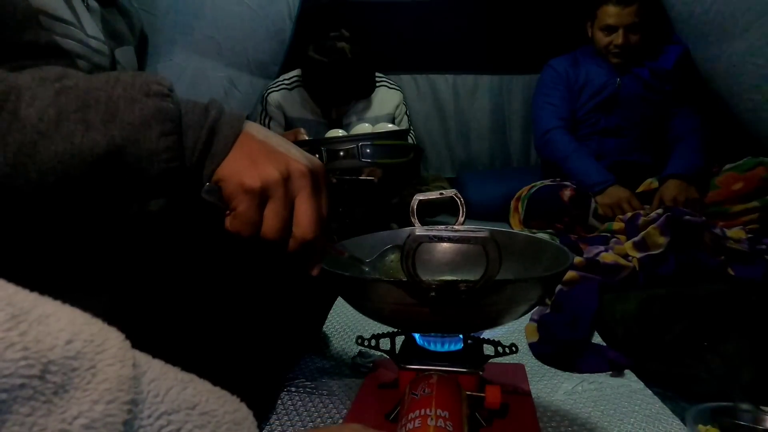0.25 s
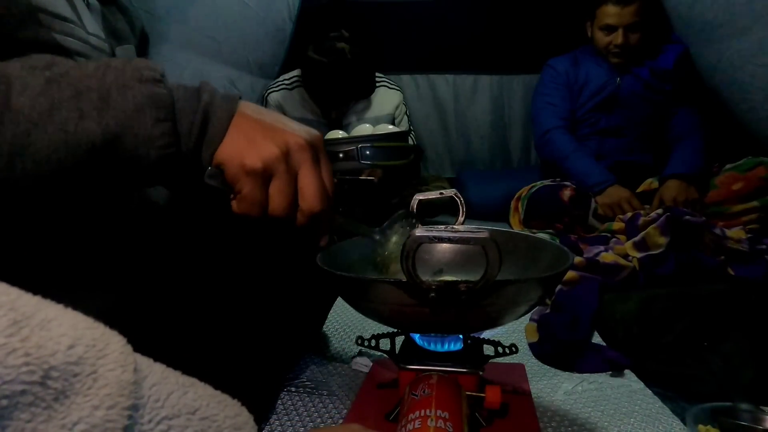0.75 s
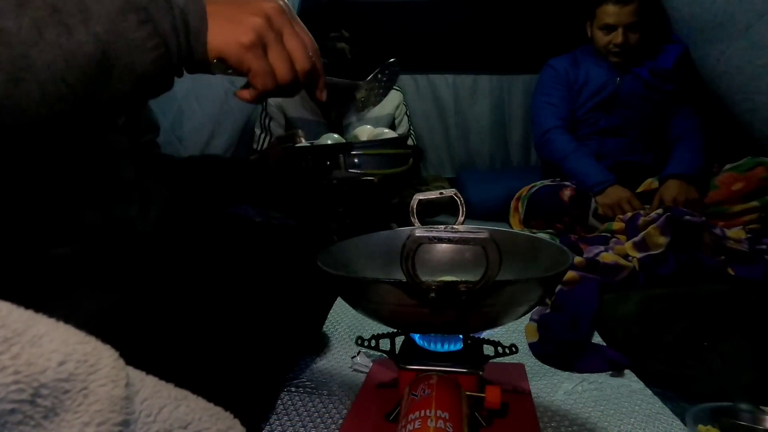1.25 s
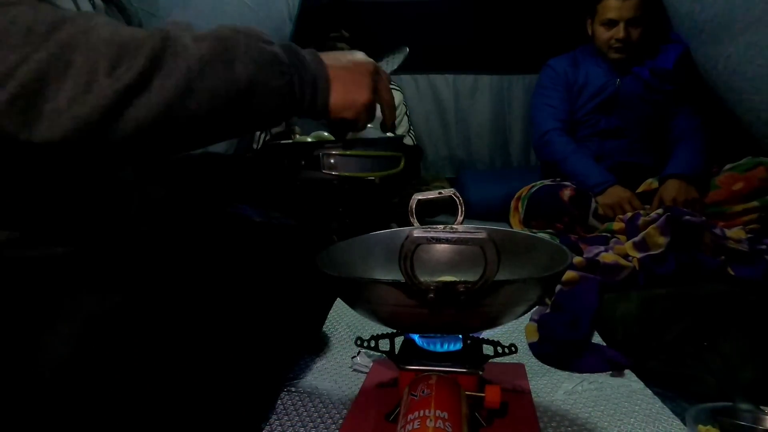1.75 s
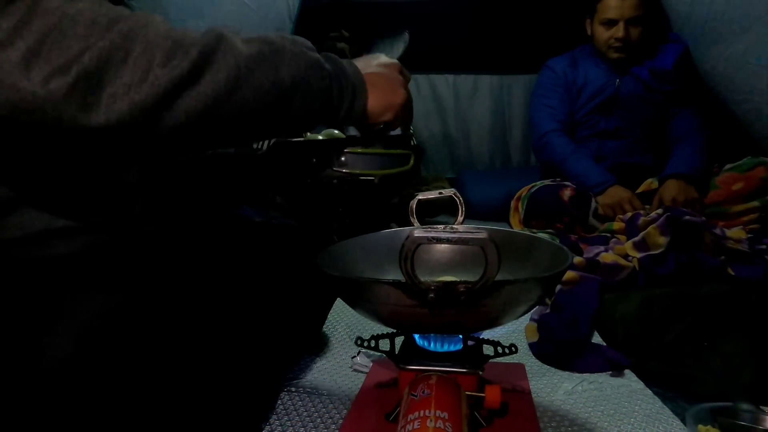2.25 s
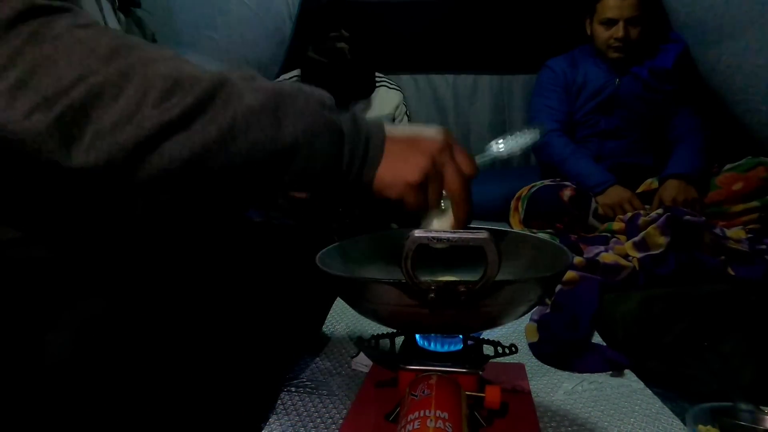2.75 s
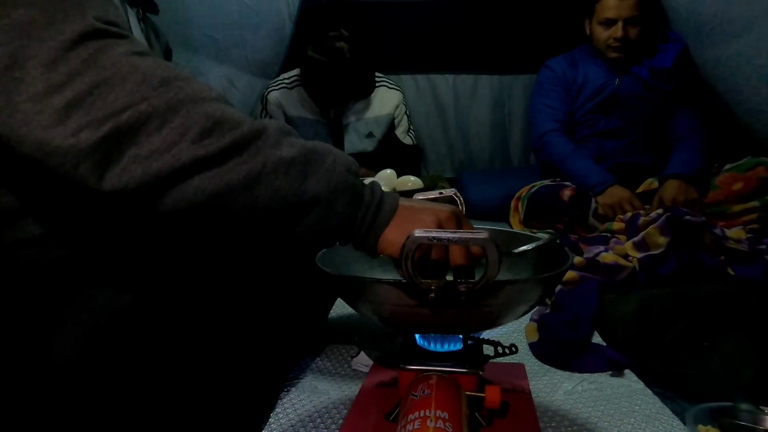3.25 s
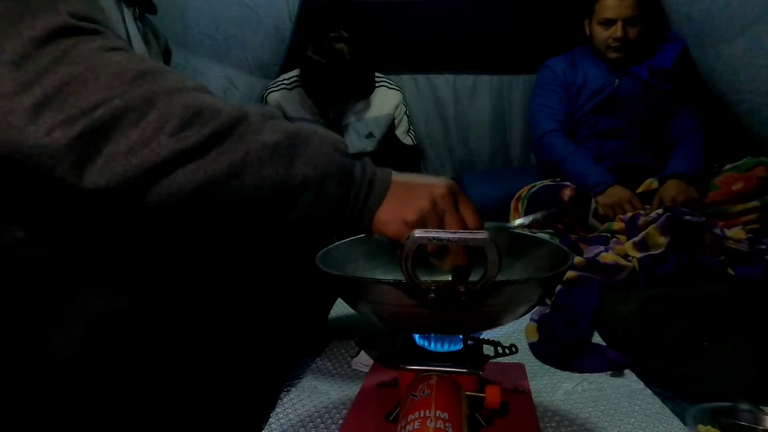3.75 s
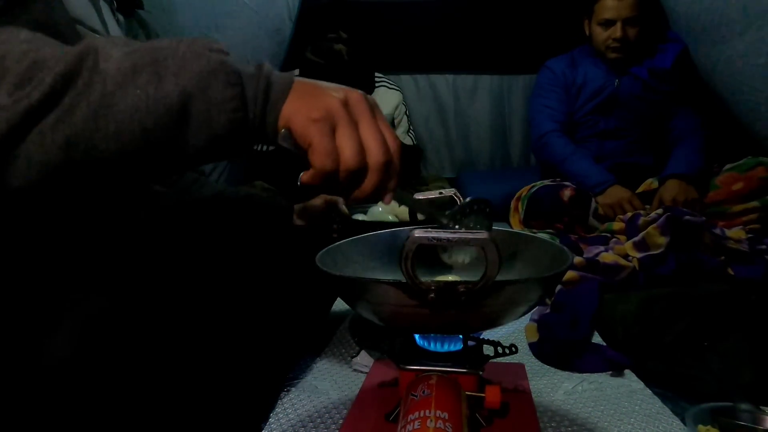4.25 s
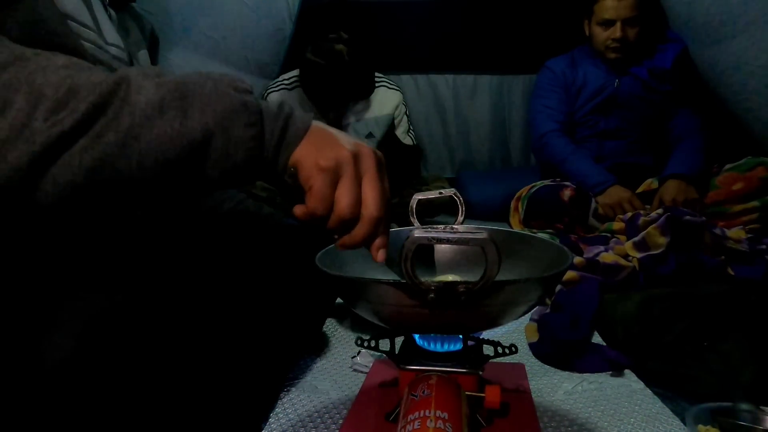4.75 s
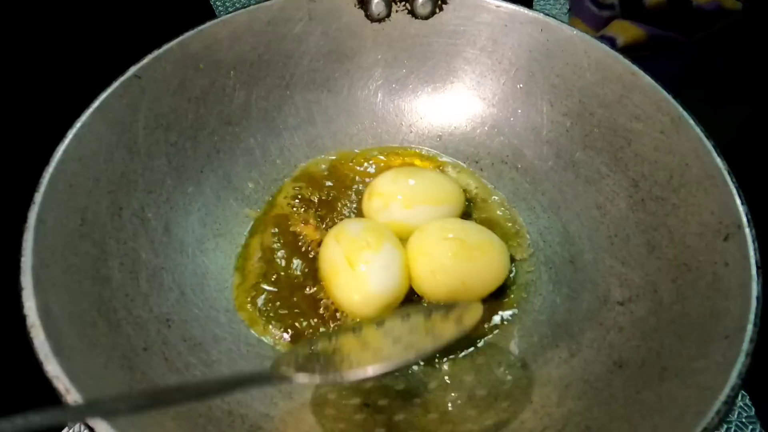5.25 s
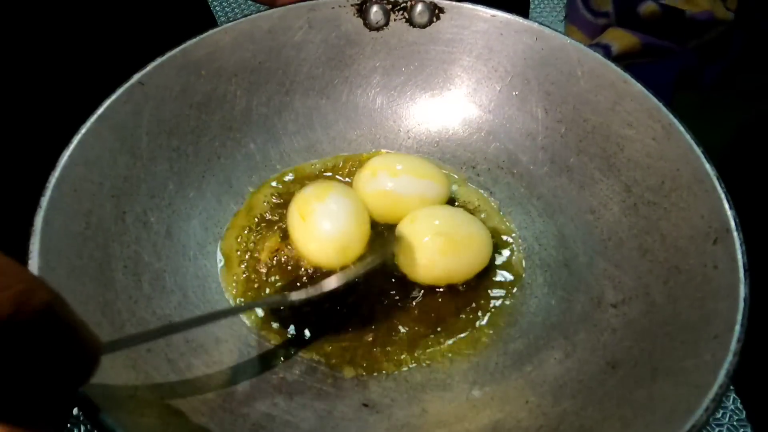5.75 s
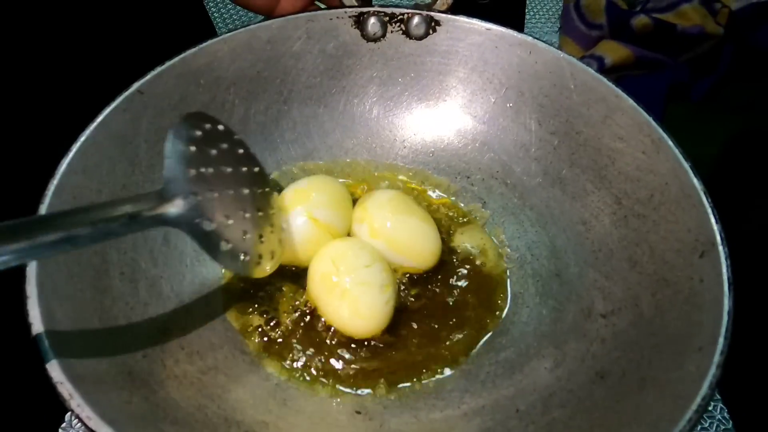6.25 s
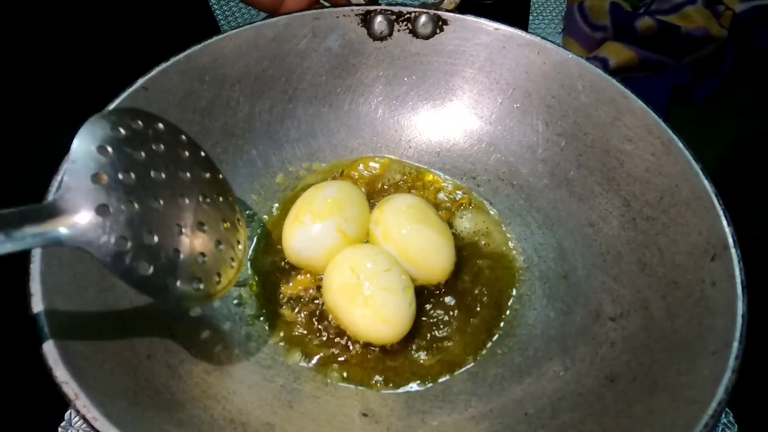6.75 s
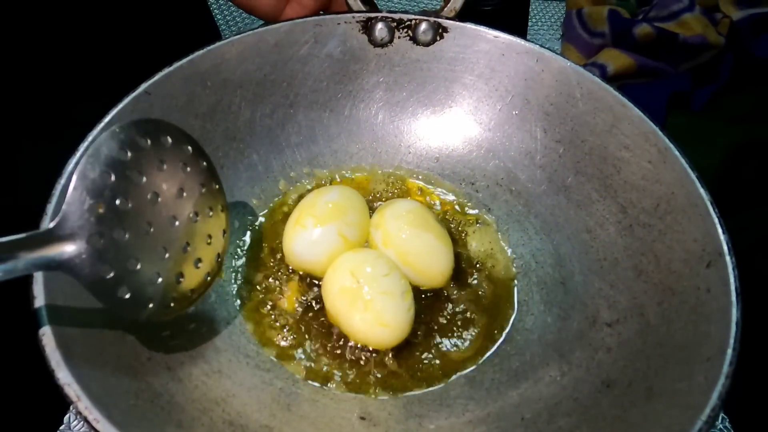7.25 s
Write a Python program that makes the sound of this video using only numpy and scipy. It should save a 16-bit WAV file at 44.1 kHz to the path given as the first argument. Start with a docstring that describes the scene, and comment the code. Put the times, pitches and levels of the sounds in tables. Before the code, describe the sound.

From 0 to 5.2 seconds, boiled eggs fry in a steel pan inside a tent, heard a step away and slightly to the right. Dense, irregular bright pops, many per second, snap and spit over fine crackle and steady sizzle, with short tent echoes, a faint narrow gas-jet hiss and a soft low rumble. Around 1.9 to 2.1 seconds come soft low bowl knocks and tiny metallic clinks. Pops thin out around 3 seconds; from about 3.6 the sizzle and airy treble strengthen, with small steam whistles and chirps near 4.1 and 5. At 5.2 everything cuts to silence, fading back in around 5.5. Now from right above the pan, dry and centred, duller sizzle mixes with wet gurgling, bubbles bending in pitch around 6 to 6.5. The strongest snaps come at about 6.6 to 6.7, another near 7.3, and frying continues to the end at about 7.5.

```python
"""Eggs frying over a gas burner.

Boiled eggs fry in oil in a steel pan inside a tent: steam bubbles ring and tear as they burst and spit, over
a sizzle of shaped noise. First heard from a step away, with echoes and the burner jet's narrow hiss; after a
short silence, from right above the pan, where large bubbles gurgle as gliding tones."""
import sys
import numpy as np
from scipy import signal
from scipy.fft import rfft, irfft
from scipy.io import wavfile
from scipy.ndimage import uniform_filter1d

SR = 44100
rng = np.random.default_rng(int(sys.argv[2]) if len(sys.argv) > 2 else 0)


def generate_wav(sig):
    """Save sig (samples, or channels by samples) to the path in sys.argv[1] as 16-bit PCM at SR."""
    pcm = np.round(np.clip(np.atleast_2d(sig).T, -1, 1) * 32767).astype(np.int16)
    wavfile.write(sys.argv[1], SR, pcm)


N = 330750

# (peak time [s], peak level [dB], pitch [Hz], thud level [dB], spit level [dB])
POPS = [(0.0149, -19, 3290, None, -35), (0.0257, -25, 2260, None, -38), (0.058, -18.5, 1910, None, -23.5),
        (0.0697, -15, 4230, None, -31), (0.098, -21.5, 1920, None, -29), (0.118, -16.5, 1640, -35, -30),
        (0.1404, -30.5, 1320, -32, -30.5), (0.1838, -25, 3650, -43, -34), (0.192, -25, 3120, -42, -27),
        (0.21, -23, 4680, None, -41), (0.2134, -26, 1240, None, None), (0.2178, -26, 2080, -42, -33),
        (0.228, -21.5, 2980, None, -39), (0.236, -21, 5340, None, None), (0.253, -27, 1230, -38, None),
        (0.301, -18.5, 5340, None, -49), (0.3105, -29, 1600, None, None), (0.3235, -18.5, 4060, None, -35),
        (0.3472, -18, 3170, None, -27), (0.3606, -18, 4100, -35.5, -36), (0.366, -34, 1140, None, None),
        (0.3843, -17, 3270, -47, -29.5), (0.4434, -16.5, 4620, None, -31), (0.458, -25.5, 2460, None, -41),
        (0.5502, -18.5, 3800, -42, -33.5), (0.5664, -27, 2570, None, None), (0.5909, -14.5, 3000, -46, -28),
        (0.595, -13.5, 4170, -43, -39), (0.611, -18, 3800, -38, -26.5), (0.6236, -25.5, 1590, -43, -27.5),
        (0.6586, -17.5, 4220, None, -36.5), (0.701, -18.5, 3330, None, -33), (0.727, -28, 3960, None, -33),
        (0.732, -28, 1950, None, -26.5), (0.772, -19, 3050, None, -27), (0.774, -18, 1900, -47, -36),
        (0.7826, -24, 2280, -45, -29.5), (0.825, -19.5, 4730, None, -36), (0.839, -22, 5500, None, -39),
        (0.873, -30, 1160, -41, -33), (0.8875, -28, 1490, -37, -30), (0.9004, -33, 1025, -30, -38),
        (0.9345, -16, 4030, None, -43), (0.976, -25.5, 1940, -55, -32), (0.9884, -18.5, 2450, None, -25.5),
        (1.016, -31, 1520, -48, -33), (1.0242, -18, 1550, -41, -32), (1.0625, -20, 4140, None, -40),
        (1.0975, -25.5, 3950, None, -51), (1.119, -30, 2200, None, -36), (1.1438, -16, 2250, -38, -42),
        (1.191, -25, 2680, None, -27.5), (1.197, -18, 4050, -42, -29), (1.2318, -17.5, 4100, -39, -36),
        (1.4361, -18.5, 3100, None, -32), (1.4491, -21.5, 2990, -37, -29), (1.4654, -17, 4500, None, -37),
        (1.53, -13.5, 2570, -38, -28), (1.5724, -20.5, 2660, -49, -31), (1.587, -25, 2530, None, -30),
        (1.619, -27, 5060, None, -39), (1.661, -22.5, 1570, -48, -31), (1.705, -29, 2950, -39, -33.5),
        (1.721, -19, 4180, -47, -36), (1.731, -17.5, 3260, -50, -29), (1.7635, -16.5, 2310, -51, -28),
        (1.771, -20, 2550, None, -41), (1.7826, -30, 1700, -38.5, -33), (1.8583, -31, 533, -29, -29.5),
        (1.8614, -14.5, 3150, -43, -47), (1.876, -15, 4050, None, -38), (1.8837, -18.5, 5560, None, None),
        (1.9188, -21.5, 2350, -29.5, -37), (1.9429, -32, 1730, -30, -44), (1.955, -30.5, 995, -31, -34),
        (1.982, -21.5, 5530, -50, -46), (2.0064, -20, 4100, -42, -32), (2.0286, -21, 3190, -40.5, -29.5),
        (2.0755, -37, 1520, -43, -40), (2.0867, -26.5, 1600, -29.5, None), (2.0994, -48, 1430, -38.5, -59),
        (2.1506, -25, 2380, None, -33), (2.164, -23, 3320, None, -35), (2.187, -25, 2020, -37.5, -32),
        (2.2336, -15, 3800, None, -43), (2.28, -26, 2970, -37.5, -32.5), (2.381, -26, 2630, -47, -30.5),
        (2.44, -19.5, 5470, -34, None), (2.4401, -19.5, 2970, None, None), (2.4567, -19, 2600, -52, -32),
        (2.548, -23.5, 3060, -32.5, -35), (2.565, -19, 2400, -40, -31), (2.6, -18, 4280, None, -49),
        (2.6145, -14, 2980, None, -36), (2.626, -23, 5570, None, -51), (2.647, -20, 2650, None, -34),
        (2.657, -22, 5200, None, -37), (2.7109, -17, 2480, -35.5, -29.5), (2.741, -17.5, 3120, -29, -30.5),
        (2.763, -15.5, 3550, -36, -35), (2.8043, -19, 5000, None, None), (2.914, -22.5, 4360, -42.5, -51),
        (3.0582, -31, 3230, None, -34.5), (3.068, -24.5, 4370, None, -45), (3.082, -23.5, 3770, None, -42),
        (3.1058, -32, 1650, -42, -37), (3.2736, -21, 5600, None, None), (3.3173, -23.5, 1980, -53, -35.5),
        (3.387, -20, 3080, -54, -28.5), (3.3995, -24.5, 1316, -37, -26.5), (3.433, -24, 3070, None, -35.5),
        (3.448, -22, 2770, -43, -36), (3.5255, -22, 3140, -33, -33), (3.544, -23.5, 5200, -38, None),
        (3.5552, -23, 2570, None, -34), (3.623, -26.5, 1860, -44, -31.5), (3.706, -24, 1980, -44, -33),
        (3.7442, -24.5, 2020, -50, -31.5), (3.765, -14, 2880, None, -46), (3.773, -19.5, 4080, -49, -30),
        (3.828, -23.5, 2140, None, -34), (3.883, -21.5, 3050, None, -25), (3.8913, -30, 1170, None, None),
        (3.9304, -21.5, 5920, None, None), (4.0608, -34, 5600, -35.5, -25), (4.0816, -22, 5600, -53, None),
        (4.096, -32, 1350, -30.5, -37), (4.259, -24, 3130, -42.5, -36), (4.284, -20.5, 3700, None, -42),
        (4.318, -29, 4430, None, -30.5), (4.345, -17, 2970, -47, -29), (4.372, -19.5, 5450, -33, -48),
        (4.3845, -16, 5650, -29, -35), (4.401, -24, 2110, -30.5, -33), (4.489, -29, 2400, -51, -27),
        (4.644, -21.5, 3370, -36, -30), (4.6576, -18, 3400, None, -28), (4.697, -15, 3120, None, -29.5),
        (4.706, -25.5, 3020, None, -32), (4.7257, -16.5, 3260, None, -29.5), (4.7454, -24, 1700, -41, -26),
        (4.756, -21.5, 3800, -59, -29), (4.7747, -18, 4560, None, -44), (4.807, -16.5, 3330, None, -31),
        (4.8417, -18.5, 3860, -33.5, -30.5), (4.895, -29, 2360, -37.5, -34),
        (4.9283, -22, 1840, None, -26.5), (4.9967, -21.5, 5320, -41.5, None),
        (5.045, -18.5, 3600, -49, -26.5), (5.058, -24.5, 3960, -37, None), (5.075, -22, 4560, -39, -35),
        (5.088, -20, 2110, -50, -29), (5.122, -21.5, 3200, -44, -43), (5.159, -41, 1225, -26.5, -27.5),
        (5.1766, -17, 2320, -52, -30), (5.55, -12, 2690, -47, None), (5.5679, -26.5, 690, None, None),
        (5.606, -18.5, 4730, -27.5, -36), (5.622, -22.5, 685, -29, -34), (5.6478, -22.5, 3040, -35, -37),
        (5.6592, -16, 4080, -33.5, -42), (5.783, -18.5, 3980, -38, None), (5.832, -18.5, 3060, None, -44),
        (5.8608, -17.5, 4760, None, None), (5.907, -21.5, 2990, -37, -30), (5.955, -17, 2900, -27.5, None),
        (5.9629, -15.5, 870, -46, -35.5), (5.966, -16.5, 2580, -39, -51), (6.0089, -13, 2770, -43, -42),
        (6.0302, -27, 1040, -40, -32), (6.044, -21, 3300, -36, -43), (6.0552, -24.5, 603, -46, -40),
        (6.07, -25.5, 2050, -34, -52), (6.0766, -25.5, 800, -42, -42), (6.091, -24.5, 1110, -33, None),
        (6.12, -19.5, 1210, -33, None), (6.182, -22.5, 3910, -33, -50), (6.2461, -18.5, 2350, -25, -37),
        (6.2896, -33, 3340, None, -29), (6.318, -14, 3260, None, -44), (6.3486, -17.5, 677, -48, -41),
        (6.362, -19, 2500, -34, -47), (6.387, -21, 2520, -36, None), (6.4385, -24, 3020, None, -41),
        (6.447, -17.5, 3100, -46, -38), (6.464, -17, 3200, -26.5, -23.5), (6.4737, -16.5, 1900, -46, -31),
        (6.5652, -11, 3080, -34, -25), (6.6102, -8, 2460, None, None), (6.622, -10.5, 2420, None, None),
        (6.689, -11, 3090, -38, -37), (6.748, -24, 2940, -44, -26.5), (6.7769, -14, 2980, None, None),
        (6.799, -26, 3060, -29.5, -36), (6.8053, -15.5, 3210, -42, -25.5), (6.8972, -27, 2420, -37, -29.5),
        (6.9059, -21, 568, None, -41), (6.907, -21, 3060, None, -28), (6.9421, -15.5, 2770, -29, -43),
        (6.959, -27, 625, None, None), (7.0451, -22, 3120, -25, -34), (7.0862, -23, 2900, -34, -41),
        (7.0974, -22.5, 3160, -39, -30), (7.1049, -21.5, 628, -25, -37), (7.225, -18.5, 2960, -49, None),
        (7.2873, -27, 690, None, -55), (7.323, -11, 2975, -34, None), (7.3276, -22.5, 610, -26.5, -48),
        (7.3691, -26, 730, -27, -55), (7.44, -14.5, 2910, None, -26), (7.4392, -19.5, 5100, None, None)]
# Small spits of oil between the bubbles: (start time [s], peak level [dB], centre [Hz])
SPITS = [(0.0334, -20.5, 4000), (0.7104, -20.5, 4130), (0.8556, -22, 4570), (1.1666, -26, 4060),
         (1.2184, -26, 5030), (1.2955, -26, 4270), (1.554, -23, 2550), (1.6092, -25, 5180),
         (2.3742, -33, 2780), (3.485, -31, 5500), (3.6152, -35.5, 1850), (3.6552, -25.5, 5900),
         (3.6787, -22, 2010), (4.125, -32, 1880), (4.1929, -29.5, 3220), (4.205, -23, 4500),
         (4.533, -20.5, 4700), (4.6725, -21, 3340), (4.7835, -28, 3200), (5.148, -23.5, 2480),
         (7.2464, -34.5, 5200), (7.2736, -31.5, 5950)]
# Short metal clinks, steam whistles, and large bubbles that ring and bend:
# (start time [s], length [s], first pitch [Hz], last pitch [Hz], first level [dB], last level [dB])
TONES = [(1.95, 0.027, 1000, 985, -40, -56), (1.979, 0.022, 1770, 1790, -30, -50),
         (3.959, 0.018, 800, 500, -41, -47), (4.108, 0.019, 1280, 1530, -34, -40),
         (4.129, .016, 1600, 1880, -40, -43), (4.253, 0.022, 1410, 1907, -56, -32.5),
         (4.993, 0.015, 710, 686, -34.5, -42), (4.998, 0.058, 1055, 1000, -40, -42),
         (5.047, 0.039, 946, 1195, -47, -40), (5.096, 0.099, 1126, 1220, -47.5, -36.5),
         (5.186, 0.023, 1173, 1280, -43.5, -29), (5.951, 0.017, 764, 473, -24.5, -28),
         (5.967, .072, 476, 762, -32.5, -25), (6.091, 0.022, 630, 765, -42, -32),
         (6.336, 0.014, 775, 695, -33, -24), (6.36, 0.046, 608, 1020, -45, -34),
         (6.409, 0.019, 683, 875, -23, -40), (6.525, 0.036, 940, 1256, -54, -34)]
# Soft low knocks as a bowl is handled close by:
# (peak time [s], peak level [dB], pitch [Hz], rise time before a 3 % shortening [ms])
KNOCKS = [(1.863, -24, 189, 0.51), (1.888, -36, 46.6, 22), (1.948, -43, 187, 6.6), (2.082, -44, 174, 18)]
# Spectra of sizzle, high treble noise (afar, then from above) and gurgle: (frequency [Hz], density [dB per Hz])
SIZZLE = [(500, -35.5), (1280, 1), (2230, 2.5), (2520, 11), (6120, 10.5), (9000, -4.5), (11700, -52),
          (19800, -120)]
TREBLE_AFAR = [(6000, -20), (8000, -5.5), (11000, -8), (13000, -20.5), (16000, -27.5)]
TREBLE_NEAR = [(7000, -30), (9500, -8), (11000, -8.5), (12500, 2.5), (14500, -11), (16000, -17.5)]
GURGLE = [(330, -25.5), (430, -22), (530, -2.5), (700, 2.5), (1200, -14), (2200, -10), (7000, -34.5),
          (12000, -84.5)]
# Spectra of flame and air, a list afar and a list near: (frequency [Hz], density [dB per Hz])
RUMBLE = [(12, -27), (20, -3.5), (44, 0), (114, -4), (160, 3), (380, -15), (880, -120)], [(12, -32),
          (20, -3.5), (242, -17), (400, -37), (880, -120)]
# Burner jet bands, afar only: (centre [Hz], width [Hz], level [dB rms])
JET = [(2530, 220, -52), (5850, 300, -61)]
# Left-right likeness, a list afar and a list near: (frequency [Hz], likeness [0-1])
LIKENESS = [(60, 1), (350, .8), (4000, .9), (11500, .2)], [(4500, 1), (13000, .2)]
# Lateness of the left channel from afar: (frequency [Hz], phase lag [rad])
LAG = [(300, 0), (1400, .19), (3400, .68), (5500, .37), (11000, 0)]
# Levels of the noises afar and then from above; the high treble noise comes and goes:
# (time [s], sizzle level [dB], high treble level [dB], gurgle level [dB])
LEVELS_AFAR = [(0.0, -40.5, -54, -69), (0.19, -45.5, -52, -62), (0.36, -48, -60.5, -74),
               (0.86, -47.5, -57, -73), (1.43, -51, -58, -66.5), (1.78, -45.5, -63, -72),
               (1.89, -48, -60.5, -50.5), (2.27, -50.5, -61, -72), (2.67, -51, -59.5, -71),
               (2.99, -49.5, -64.5, -68.5), (3.3, -50.5, -64.5, -70.5), (3.58, -45, -56, -74),
               (3.9, -44, -48.5, -62.5), (4.19, -42.5, -51, -52), (4.65, -43, -55.5, -61.5),
               (5.0, -42, -48, -52)]
LEVELS_NEAR = [(5.72, -46.5, -96, -42), (6.1, -45, -76, -48.5), (6.33, -41.5, -78, -41.5),
               (6.46, -43.5, -44, -37), (6.52, -45, -78, -54), (6.75, -44.5, -58, -45.5),
               (7.1, -45.5, -68, -52.5), (7.5, -47.5, -58, -50.5)]
SIZZLE_COLUMN, TREBLE_COLUMN, GURGLE_COLUMN = 1, 2, 3

CUT_S, BACK_S, FULL_S = 5.213, 5.485, 5.56  # sound stops, fades in again, is full
EDGE_HZ = 15900  # upper band limit
RISE_S, POP_HZ = 0.001318, 2970  # swelling time of a middling bubble from afar, and its pitch
LOW_LONGER = .5  # low bubbles take longer (power of pitch)
NEAR_QUICKER = 0.806  # factor on the swelling time from above
AFTER_DB, AFTER_S = -9.5, 0.0064  # follower: strongest level re the pop, middling delay
BEND = 0.74  # a glide is quickest at its start (power of time)
SPUTTER, GRIT = .35, 0.19  # waver of a tone's level, share of rough noise in it
DULL_DB, DULL_HZ = 4, 3300  # from above the sizzle loses this much per octave over this pitch
RUMBLE_AFAR_DB, RUMBLE_NEAR_DB = -55, -52  # at the usual gurgle level
RUMBLE_FOLLOWS, GURGLE_USUAL_DB = 0.29, -56  # rumble rises by this share of the gurgle's dB above usual


def gain_of(db):
    """Logarithmic level: 20 dB is a tenfold amplitude."""
    return 10 ** (np.asarray(db) / 20)


def evened(x):
    """Power normalisation to rms 1."""
    return x / np.sqrt(np.mean(x ** 2) + 1e-20)


def read(points, hz):
    """Interpolation of a table on a logarithmic frequency axis."""
    f, value = np.transpose(points)
    return np.interp(np.log(hz + 1), np.log(f + 1), value)


def noise_level(column, t):
    """Linear interpolation in time of one noise level in dB."""
    rows = np.array(LEVELS_AFAR + LEVELS_NEAR)
    return np.interp(t, rows[:, 0], rows[:, column])


def add(mix, s, sound):
    """Superposition: the sound adds to the mix from second s."""
    part = mix[max(round(s * SR), 0):][:len(sound)]
    part += sound[:len(part)]


def band(x, lo_hz, hi_hz):
    """Band-pass filtering with gentle slopes."""
    edges = [lo_hz, min(hi_hz, SR * .45)]
    return signal.sosfilt(signal.butter(2, edges, "bandpass", fs=SR, output="sos"), x)


def band_twice(x, lo_hz, hi_hz):
    """Cascaded band-pass filtering, for steeper slopes."""
    return band(band(x, lo_hz, hi_hz), lo_hz, hi_hz)


def swell(t, rise):
    """Impulsive envelope: a smooth rise to 1 at the time rise, then a slower fall."""
    return (t / rise * np.exp(1 - t / rise)) ** 2


def wash(afar, near, level_db, size, patchy_db, flicker_db):
    """Short-time spectral synthesis: random spectra with patches, wide flicker and partial coherence."""
    hop, hz = size // 4, np.fft.rfftfreq(size, 1 / SR)
    frames = N // hop + 5
    a, b, c, d, patches = rng.standard_normal((frames, len(hz), 5)).T
    patches = evened(uniform_filter1d(uniform_filter1d(patches, 8, 0), 12, 1))
    flicker = evened(uniform_filter1d(rng.standard_normal(frames), 3))
    far = np.arange(frames) * hop / SR < BACK_S
    # the right ear shares part of the left ear's spectrum
    same_afar, same_near = (read(points, hz)[:, None] for points in LIKENESS)
    same = np.clip(np.where(far, same_afar, same_near), 0, 1)
    left = a + 1j * b
    right = same * left + np.sqrt(1 - same ** 2) * (c + 1j * d)
    colour_afar, colour_near = (evened(gain_of(read(points, hz)))[:, None] for points in (afar, near))
    colour = np.where(far, colour_afar, colour_near)
    spectra = np.array([left, right]) * colour * gain_of(patchy_db * patches + flicker_db * flicker)
    noise = signal.istft(spectra, nperseg=size, noverlap=size - hop)[1][:, :N]
    return evened(noise) * gain_of(level_db)


def noise_bed(t):
    """Band-shaped random noise: sizzle and gurgle, and a high treble noise that comes and goes."""
    duller = [(hz, db - DULL_DB * max(np.log2(hz / DULL_HZ), 0)) for hz, db in SIZZLE]
    bed = wash(SIZZLE, duller, noise_level(SIZZLE_COLUMN, t), size=512, patchy_db=2.5, flicker_db=3)
    bed += wash(TREBLE_AFAR, TREBLE_NEAR, noise_level(TREBLE_COLUMN, t), size=512, patchy_db=3, flicker_db=4)
    bed += wash(GURGLE, GURGLE, noise_level(GURGLE_COLUMN, t), size=512, patchy_db=3, flicker_db=3)
    return gain_of(-2) * bed


def rumble(t):
    """Low-frequency noise of flame and air, whose level partly follows the gurgle."""
    base_db = np.where(t < CUT_S, RUMBLE_AFAR_DB, RUMBLE_NEAR_DB)
    extra_db = RUMBLE_FOLLOWS * (noise_level(GURGLE_COLUMN, t) - GURGLE_USUAL_DB)
    return wash(*RUMBLE, base_db + extra_db, size=2048, patchy_db=2.0, flicker_db=2.2)


def burner():
    """Jet noise: gas leaving the jet hisses in two narrow bands, partly alike in both ears."""
    noise = rng.standard_normal((2, N))
    noise[1] = .85 * noise[0] + .5 * noise[1]
    hiss = np.zeros((2, N))
    for hz, width, db in JET:
        hiss += gain_of(db) * evened(band_twice(noise, hz - width / 2, hz + width / 2))
    return hiss * (np.arange(N) < CUT_S * SR)


def crackle(lo_hz, hi_hz, rise, per_s, spread_db, level_db, column):
    """Random impulse train: countless small bubbles follow a noise level, each ringing upward and tearing."""
    size = gain_of(spread_db * np.minimum(rng.exponential(1, N), 3)) * (rng.random(N) < per_s / SR)
    kind, t, out = rng.integers(0, 36, N), np.arange(1024) / SR, np.zeros(N)
    for k, hz in enumerate(np.geomspace(lo_hz, hi_hz, num=36)):
        slow, climb = rise * rng.uniform(.6, 2), rng.uniform(0, .06)
        ring = np.sqrt(2) * np.sin(2 * np.pi * hz * t * (1 + climb * t / slow))
        tear = evened(band_twice(rng.standard_normal(1024), hz / 1.8, hz * 1.5))
        snap = swell(t, slow) * (.6 * ring + tear)
        out += signal.oaconvolve(size * (kind == k), snap / np.linalg.norm(snap))[:N]
    return evened(out) * gain_of(level_db + noise_level(column, np.arange(N) / SR))


def burst(t, hz, rise, noise):
    """Bubble resonance of peak 1: a ring whose pitch climbs as the skin thins, and the tearing noise."""
    tone = np.sin(2 * np.pi * hz * t * (1 + 1.0 * t))
    tear = evened(band_twice(noise, hz / 1.36, hz * 1.343))
    body = (tone + 0.46 * hz / POP_HZ * tear) * swell(t, rise)
    return body / abs(body).max()


def pop(s, db, hz, thud_db, spit_db, noise, chance):
    """Bubble collapse: a burst and a smaller follower; the oil around thuds and a spray of droplets spits."""
    t = np.arange(2048) / SR
    rise = RISE_S * (POP_HZ / hz) ** LOW_LONGER
    if s > CUT_S:
        rise *= NEAR_QUICKER
    late = np.maximum(t - AFTER_S * (.5 + chance[0]), 0)
    follower = burst(late, hz * 2.5 ** (chance[2] - .5), rise, noise[3])
    sound = gain_of(db) * (burst(t, hz, rise, noise[0]) + gain_of(AFTER_DB) * chance[1] * follower)
    if spit_db is not None:
        spray = evened(band(band(noise[2], 0.89 * hz, hz + 4000), 400, 6530))
        sound = sound + spray * swell(t, 1.44 * rise) * gain_of(spit_db)
    if thud_db is not None:
        thud = evened(band(noise[1], 450, 1520))
        sound = sound + thud * swell(t, 0.0016 + 0.18 * rise) * gain_of(thud_db)
    return s - rise, sound


def echoes(x, build_s, t60, lo_hz, hi_hz):
    """Exponential reverberation: sparse taps of random sign, other ones for each ear, build up and die away."""
    taps = np.zeros((2, 8000))
    at = np.arange(0, 7960, 20) + rng.integers(0, 20, (2, 398))
    np.put_along_axis(taps, at, rng.choice([-1., 1.], at.shape), 1)
    t = np.arange(8000) / SR
    tail = band(taps * gain_of(-60 * t / t60) * np.clip(t / build_s, 0, 1), lo_hz, hi_hz)
    return signal.oaconvolve(x[None], tail / np.linalg.norm(tail[0]), axes=1)[:, :N]


def tent_echo(pan):
    """Reflection from the tent walls, much of it common to both ears."""
    tent = echoes(pan, build_s=0.0005, t60=0.041, lo_hz=430, hi_hz=14000)
    return gain_of(-5.5) * (tent + 0.54 * tent[::-1])


def spit(s, db, hz, noise):
    """Band-limited noise burst: a short hiss around its centre."""
    t = np.arange(len(noise)) / SR
    hiss = band_twice(noise, hz / 1.33, hz * 1.41) * swell(t, 0.0013)
    return s, gain_of(db) * hiss / abs(hiss).max()


def knock(s, db, hz, ms):
    """Amplitude envelope on a sinusoid: a soft low knock, a low tone that swells and fades."""
    t, rise = np.arange(6000) / SR, ms * 0.00097
    return s - rise, gain_of(db) * swell(t, rise) * np.cos(2 * np.pi * hz * (t - rise))


def gliding_tone(s, length, first_hz, last_hz, first_db, last_db):
    """Frequency and amplitude modulation: a sputtering, unsteady tone moves from one pitch to another."""
    u = np.arange(0, length, 1 / SR) / length
    slow_noise = rng.standard_normal((2, len(u)))
    waver, wobble = (evened(signal.oaconvolve(v, np.hanning(300), "same")) for v in slow_noise)
    pitch = (first_hz + (last_hz - first_hz) * u ** BEND) * (1 + 0.017 * wobble)
    tone = np.sqrt(2) * np.sin(2 * np.pi * np.cumsum(pitch) / SR)
    grit = evened(signal.oaconvolve(rng.standard_normal(len(u)), np.hanning(50), "same"))
    level = gain_of(first_db + (last_db - first_db) * u) * signal.windows.tukey(len(u), .3)
    return s, tone * (1 + SPUTTER * waver + GRIT * grit) * level


def bowl_echo(pan):
    """Early reflection: the steel bowl throws the pops back, alike to both ears."""
    return gain_of(-11) * echoes(pan, build_s=0.00016, t60=0.035, lo_hz=730, hi_hz=10200)[0]


def scene():
    """Superposition of direct and reflected sound: the tent's echo from afar, almost dry from above."""
    pan = crackle(1200, 6000, rise=0.0007, per_s=500, spread_db=5.5, level_db=-3, column=SIZZLE_COLUMN)
    pan = pan + crackle(600, 1300, rise=0.002, per_s=70, spread_db=1.5, level_db=-2, column=GURGLE_COLUMN)
    for row in POPS:
        add(pan, *pop(*row, rng.standard_normal((4, 2048)), rng.random(3)))
    for row in SPITS:
        add(pan, *spit(*row, rng.standard_normal(1024)))
    for row in TONES:
        add(pan, *gliding_tone(*row))
    for row in KNOCKS:
        add(pan, *knock(*row))
    t = np.arange(N) / SR
    far = t < CUT_S
    reflected = tent_echo(pan * far) + bowl_echo(pan * ~far)
    return pan + reflected + noise_bed(t) + rumble(t) + burner()


def record(dry):
    """Interaural level and phase set the pan to the right afar; silence and a fade join the views; band limit."""
    t = np.arange(N) / SR
    far = t < CUT_S
    lag = np.exp(-1j * read(LAG, np.fft.rfftfreq(N, 1 / SR)))
    late_left = irfft(rfft(dry[0]) * lag, N)
    left = np.where(far, gain_of(-1.1) * late_left, dry[0])
    right = np.where(far, gain_of(.9), 1) * dry[1]
    fade_out = np.clip((CUT_S - t) / 0.00062, 0, 1)
    fade_in = np.clip((t - BACK_S) / (FULL_S - BACK_S), 0, 1) ** 1.17
    joined = np.array([left, right]) * (fade_out + fade_in)
    low_pass = signal.firwin(511, EDGE_HZ, window=("kaiser", 9), fs=SR)
    return signal.oaconvolve(joined, low_pass[None], "same")


dry = scene()
out = record(dry)
generate_wav(out)
```